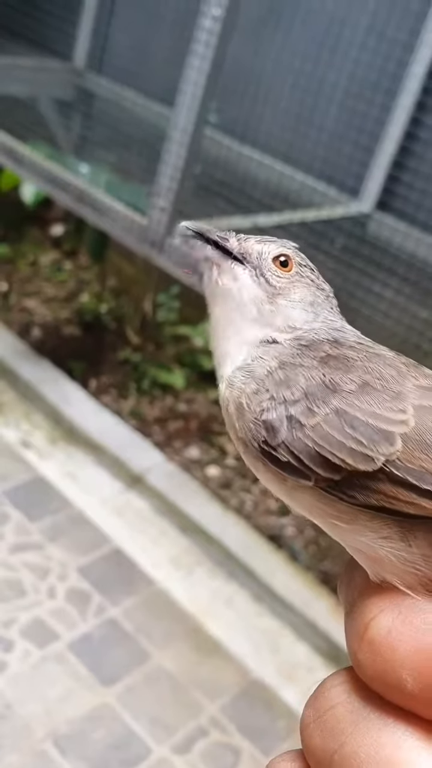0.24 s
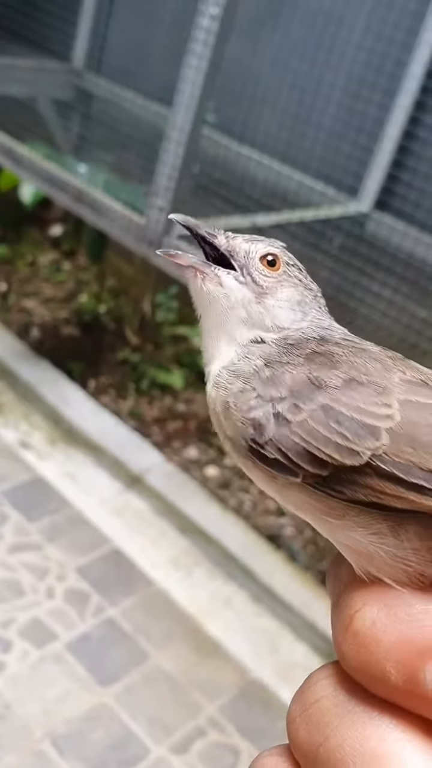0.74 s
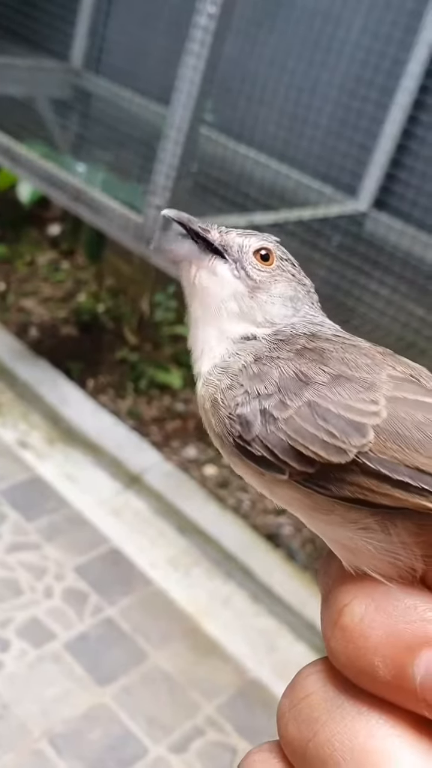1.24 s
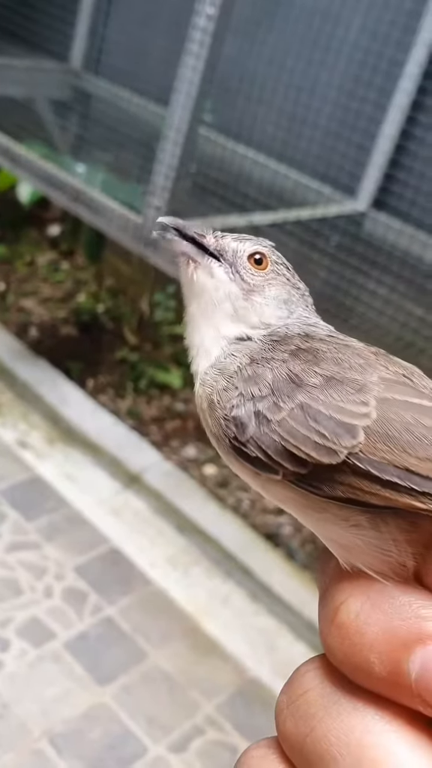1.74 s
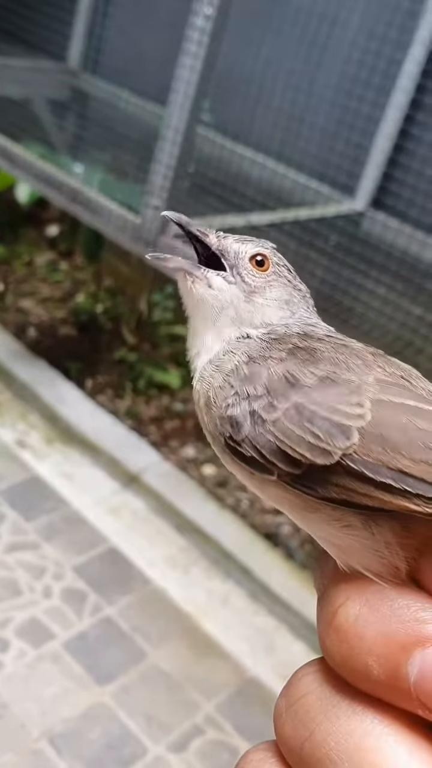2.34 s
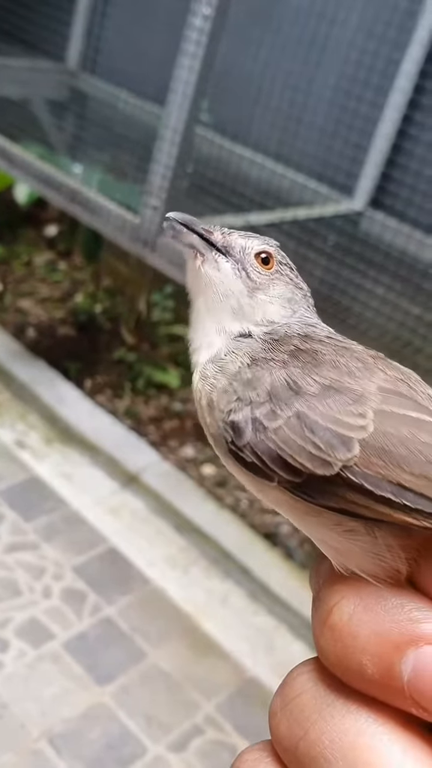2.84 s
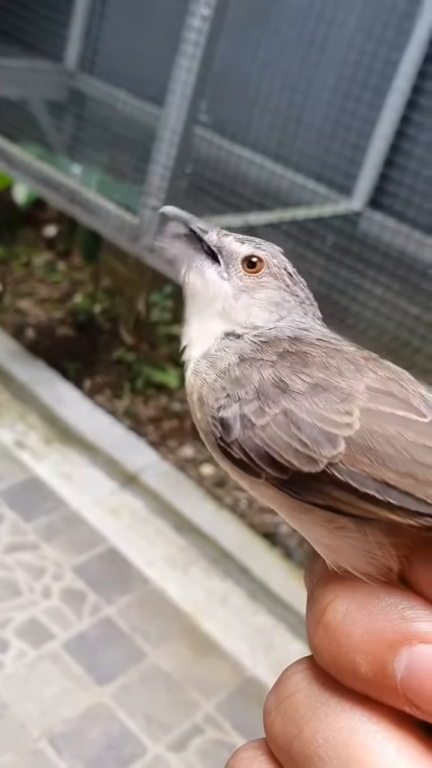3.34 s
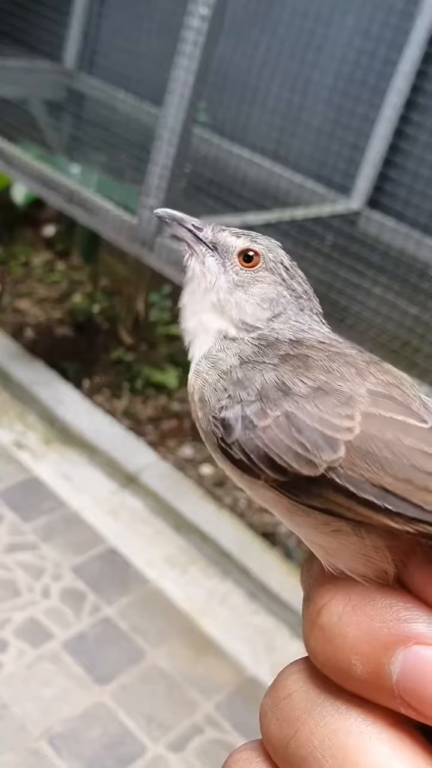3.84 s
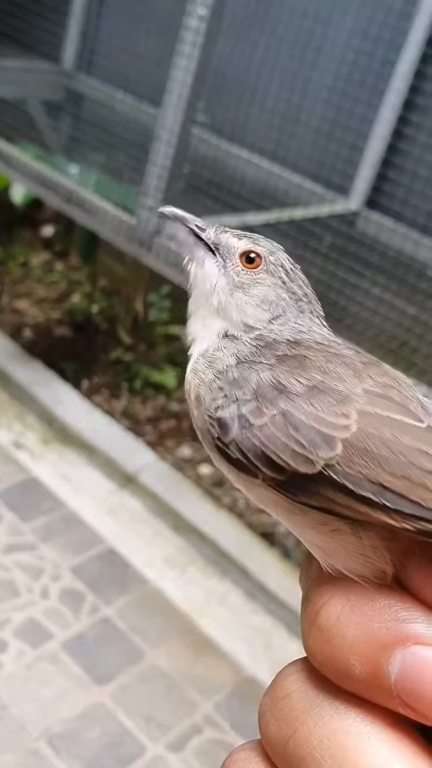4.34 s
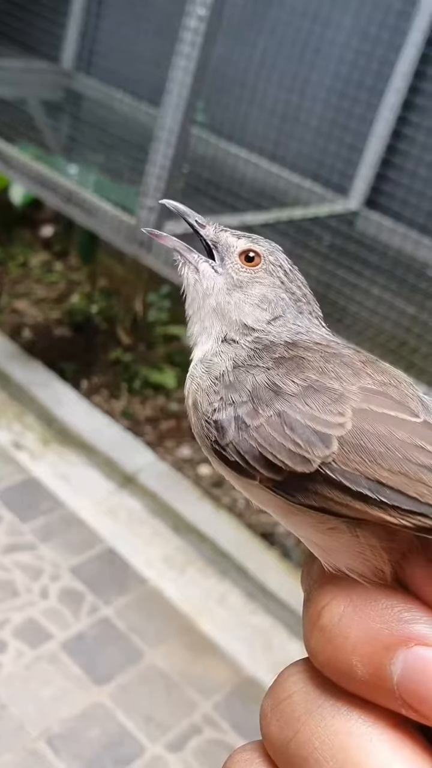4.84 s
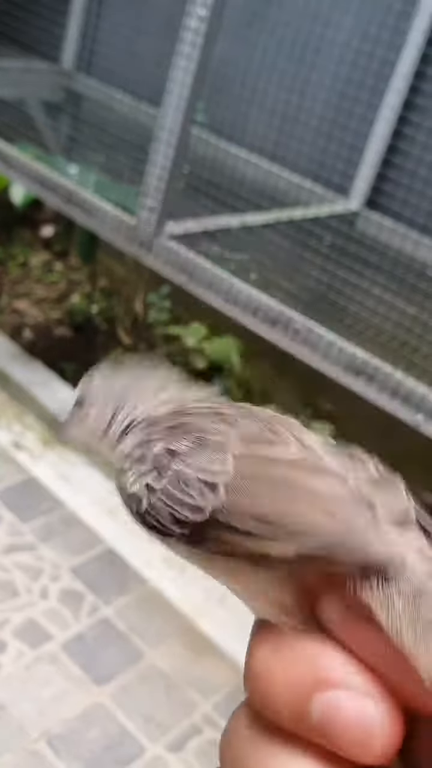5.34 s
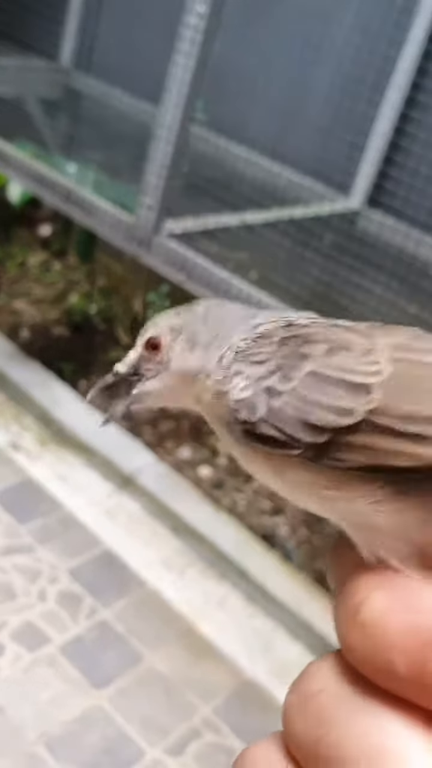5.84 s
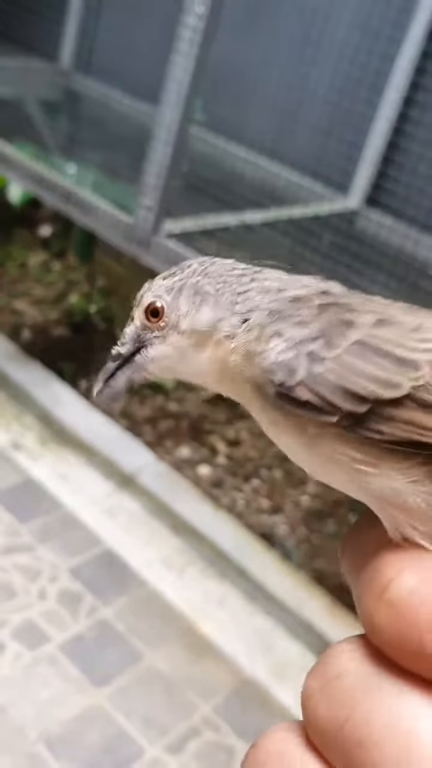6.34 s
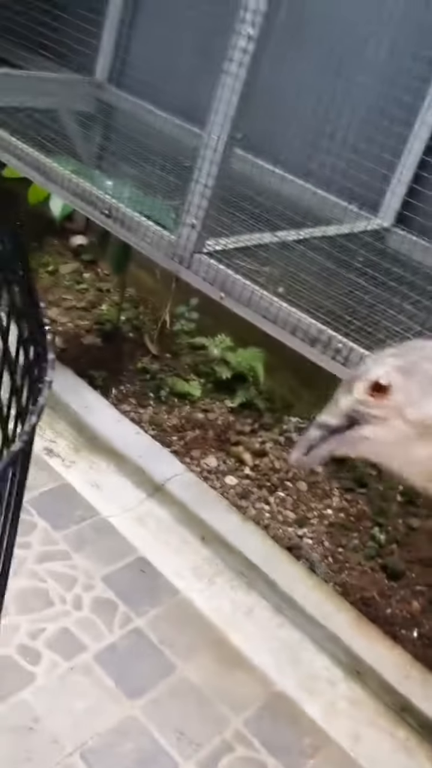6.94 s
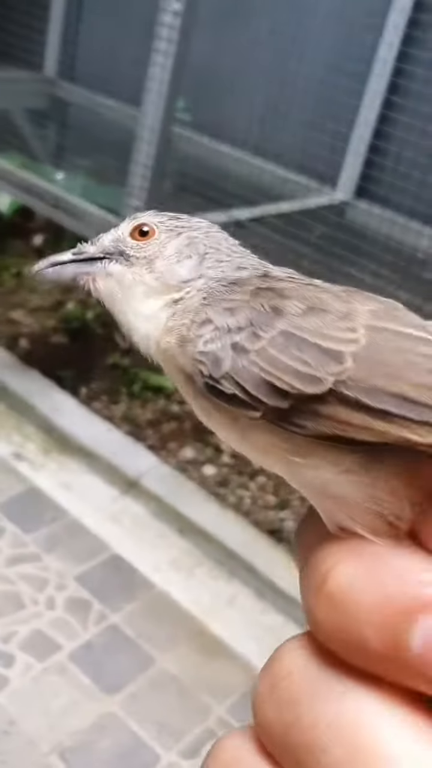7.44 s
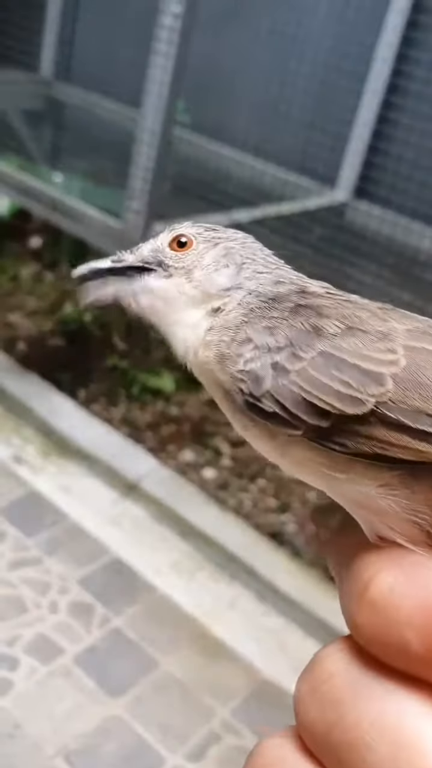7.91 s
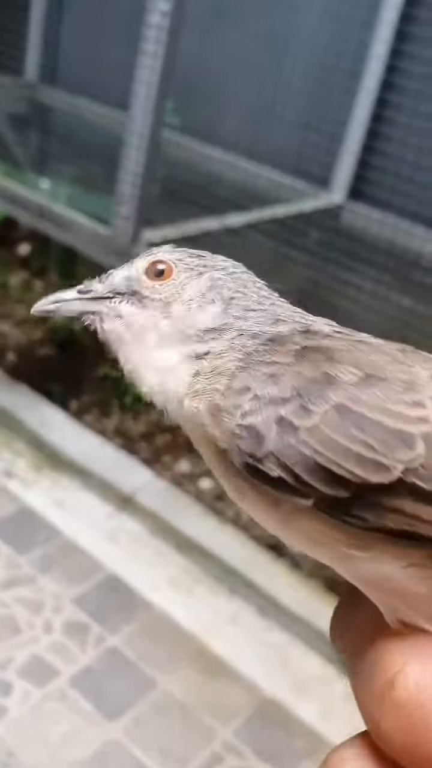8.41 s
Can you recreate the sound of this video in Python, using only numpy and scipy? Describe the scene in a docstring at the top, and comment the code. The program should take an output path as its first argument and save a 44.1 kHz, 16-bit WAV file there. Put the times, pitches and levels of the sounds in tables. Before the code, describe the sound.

In a quiet yard, a small bird right by the microphone whistles two brief series of high upward slurs, followed by a burst of chips and a loud, fast trill. After a short pause it trills again for longer, the piercing notes crackling slightly as they overload the microphone. Behind it are occasional thin peeps from a more distant bird, faint dry rustles and a soft, low rush of air.

```python
"""A prinia, a small songbird, sings in someone's hand close to the microphone, in a yard with wire cages.
Its voice organ whistles two phrases of rising slurs, a short run and two long trills of falling chips.
The loud notes overload the microphone, which adds a soft thump and crackle. A second bird peeps
farther off, something rustles now and then, and a faint hum comes and goes in the quiet air."""
import sys
import numpy as np
from scipy import signal
from scipy.fft import rfft, irfft
from scipy.io import wavfile
from scipy.ndimage import uniform_filter1d, minimum_filter1d

SR = 44100
rng = np.random.default_rng(int(sys.argv[2]) if len(sys.argv) > 2 else 0)


def persist_wave(psi):
    """Save psi, clipped to +-1, as 16-bit WAV."""
    counts = np.round(np.clip(psi, -1, 1) * 32767).astype(np.int16)
    wavfile.write(sys.argv[1], SR, np.atleast_2d(counts).T)


N = 382347


def prinia(chip_reach_hz=5000, slur_reach_hz=5260):
    """The near bird sings short diving chips, alone and in trills, and longer rising slurs."""
    # one chip: t/s from mid-sweep, f/Hz, level/dB
    chip_shape = [(-.009, 6850, -40), (-.007, 6420, -16), (-.005, 5920, -3), (-.003, 5330, 2),
                  (0, 4500, -1.5), (.0055, 3330, -4), (.009, 2790, -19), (.014, 2280, -29),
                  (.026, 1560, -47)]
    # one slur: t/s from mid-sweep, f/Hz, level/dB
    slur_shape = [(-.034, 1590, -46.5), (-.021, 2290, -32.5), (-.012, 3213, -10), (0, 3923, -4.5),
                  (0.01, 4850, -4), (0.016, 5320, -5), (.018, 5380, 3)]
    # single chips that open or close a phrase: t/s, level/dB, length factor
    lone_chips = [(0.3926, -17.5, 1.14), (1.107, -15, 1.38), (1.168, -34, 2.1), (1.7831, -14.5, 1.2),
                  (1.844, -18.5, 0.91), (2.28, -25.5, 0.76), (2.543, -12, 1.2), (2.6052, -15.5, 0.67),
                  (6.1069, -13.5, 1)]
    # rising notes: t/s, level/dB, length factor
    slur_notes = [(0.488, -17, 0.69), (0.5589, -13.5, 0.82), (0.6348, -11.5, 0.95), (0.7097, -10, 0.95),
                  (0.7817, -12, 0.93), (0.8575, -11.5, 0.95), (1.203, -14.5, 0.53), (1.2765, -10.5, 0.94),
                  (1.3527, -8.5, 0.92), (1.4270, -11, 1.06), (1.502, -10.5, 0.84)]
    # runs of chips: first and last t/s, chip count, haste and slowing per chip (shares of a gap),
    # first and last level/dB, first and last length factor, first and last reach/Hz
    trills = [(1.901, 2.2152, 7.2, 0.0014, 0.011, -14, -10, 0.7, 1.02, 5050, 5060),
              (2.668, 4.6195, 29.5, 0.022, 0.0013, -9, -9.5, 0.92, 0.93, 6060, 6700),
              (6.1715, 8.6426, 38, .103, .001, -7.5, -9, .9, .97, 5623, 7600)]
    falling = [(*chip, chip_reach_hz) for chip in lone_chips]
    falling += [chip for row in trills for chip in trill(*row)]
    rising = [(*slur, slur_reach_hz) for slur in slur_notes]
    chips = sing(falling, chip_shape, octave_db=-29, third_db=-33.5, hiss_db=-25,
                 pitch_spread=.014, jitter=.012, shimmer_db=2)
    slurs = sing(rising, slur_shape, octave_db=-38, third_db=-38, hiss_db=-24.5,
                 pitch_spread=.0051, jitter=.012, shimmer_db=2.4)
    return chips + slurs


def trill(first_s, last_s, chips, haste, slowing, first_db, last_db, first_length, last_length,
          first_hz, last_hz, settle_chips=2, spread_db=.12):
    """The bird rushes the first chips, then slowly tires: gaps and chips get longer."""
    k = np.arange(round(chips) - 1)
    gaps = 1 - haste * np.exp(-k / settle_chips) + slowing * k
    progress = np.append(0, np.cumsum(gaps)) / gaps.sum()
    first = (0, first_s, first_db, first_length, first_hz)
    last = (1, last_s, last_db, last_length, last_hz)
    s, db, length, reach_hz = along([first, last], progress)
    db = db - spread_db * rng.standard_normal(len(s))
    return list(zip(s, db, length, reach_hz))


def sing(notes, shape, octave_db, third_db, hiss_db, pitch_spread, jitter, shimmer_db,
         crack_s=.0029, crack_db=11, crack_jump=.15, strain=.11, release_s=.0015):
    """Each note is the same sweep, sung longer or shorter, with a little hiss; no two are alike."""
    # where the voice cracks: t/s, strength
    cracks = [(0.494, 0.35), (0.5672, 0.83), (.789, 0.21), (0.8642, 0.22), (1.213, 1), (1.436, 0.36),
              (1.511, 0.41), (3.396, 0.32), (4.207, 0.35), (7.621, 0.35), (7.691, 0.32), (8.504, 0.64)]
    # a bright, rasping hiss that rides on each note: f/Hz, level/dB
    hiss_colour = [(1500, -16.5), (5000, -1), (7500, -3.5), (10500, -11), (12700, -2), (14000, -9)]
    out, hiss_level = np.zeros(N), np.zeros(N)
    for s, level_db, length, reach_hz in notes:
        t = np.arange(shape[0][0] * length, shape[-1][0] * length, 1 / SR)
        hz, db = along(shape, t / length)
        hz = hz * (1 + pitch_spread * rng.standard_normal() + jitter * waver(672, size=len(t)))
        db = db + level_db + shimmer_db * waver(510, size=len(t))
        # a note with no listed crack gets a small random one
        small_crack = s + crack_s * rng.standard_normal(), strain * rng.exponential()
        at, strength = next((row for row in cracks if t[0] < row[0] - s < t[-1]), small_crack)
        # at a crack the pitch jumps about; the level sags, with a surge on either side
        away = ((s + t - at) / crack_s) ** 2
        crack = strength * np.exp(-away / 2)
        hz = hz * (1 + crack_jump * crack * (1 + waver(1700, size=len(t))))
        db = db + crack_db * crack * (away - 1)
        # the voice fades out above the highest pitch it can reach
        db = db - 10 * np.log10(1 + (hz / reach_hz) ** 30)
        release = np.minimum((t[-1] - t) / release_s, 1)
        add(out, s + t[0], whistle(hz, db, octave_db, third_db) * release)
        add(hiss_level, s + t[0], from_db(db + hiss_db))
    return out + hiss_level * noise(hiss_colour)


def whistle(hz, db, octave_db, third_db):
    """A nearly pure tone with two overtones, like a bird's voice softened by its throat."""
    phase = 2 * np.pi * np.cumsum(hz) / SR
    octave = from_db(octave_db) * np.sin(2 * phase)
    third = from_db(third_db) * np.sin(3 * phase) * (3 * hz < SR / 2)
    return np.sqrt(2) * from_db(db) * (np.sin(phase) + octave + third)


def yard(x, direct_db, tail_db, t60=.39, build_s=.00067, early_db=4, early_s=.02):
    """Sound arrives directly, then as close echoes and a blurred tail that loses 60 dB in t60 seconds."""
    # hand, phone and cage throw the sound back: delay/s, level/dB
    echoes = [(.0012, -14.5), (.0035, -11.5), (.0061, -18.5), (0.0163, -35.5), (0.018, -28)]
    # tone of the yard's tail: f/Hz, level/dB
    tail_colour = [(500, 5.5), (2000, 4.5), (3200, -2), (4500, -5), (6000, -11), (8000, -2.5), (13000, -5)]
    t = np.arange(SR) / SR
    fade = from_db(-60 * t / t60 + early_db * np.exp(-t / early_s))
    build = 1 - np.exp(-t / build_s)
    tail = rms_one(noise(tail_colour, size=SR) * fade * build)
    response = from_db(tail_db) * tail / np.sqrt(SR)
    response[0] += from_db(direct_db)
    for delay, db in echoes:
        response[round(delay * SR)] += from_db(db)
    return signal.fftconvolve(x, response)[:N]


def overload(song, crackle_db=-35, top_hz=11500):
    """The microphone flattens one side of the wave: loud notes gain an octave, a thump and crackle."""
    # how lopsided the wave gets, most while the beak points down: t/s, bend/dB
    bends = [(0, -12), (4.7, -9.5), (6.1, 4), (6.85, -1), (7.12, 13.5), (7.55, -8), (8.67, -5.5)]
    # crackle that rides on loud notes: f/Hz, level/dB
    crackle_colour = [(120, -10.5), (280, 7.5), (520, 9), (880, 11.5), (1600, 12.5), (4000, -8.5),
                      (7500, -19), (10000, -19), (13000, -32.5)]
    bend_db, = along(bends, np.arange(N) / SR)
    bent = song / (1 + from_db(bend_db) * np.maximum(-song, 0))
    bent = signal.sosfilt(signal.butter(4, top_hz, fs=SR, output="sos"), bent)
    loudness = np.sqrt(np.abs(uniform_filter1d(song ** 2, size=64)))
    return bent + from_db(crackle_db) * loudness * noise(crackle_colour)


def ringing_yard(level_db=-30, t60=.27, band_hz=(2700, 5900)):
    """A fading wash of noise: at the start the yard still rings with an earlier phrase."""
    wash = signal.sosfilt(signal.butter(5, band_hz, "band", fs=SR, output="sos"), rng.standard_normal(N))
    return rms_one(wash) * from_db(level_db - 60 * np.arange(N) / SR / t60)


def far_bird(jitter=.016, shimmer_db=3.5):
    """A second bird whistles thin, slightly arched, trembling peeps with a strong octave."""
    # its calls: t/s, length/s, f/Hz, level/dB, octave/dB
    peeps = [(0.053, 0.11, 4790, -32, -10), (1.225, 0.064, 4670, -27, -15.5), (1.3, 0.046, 4700, -45, -16),
             (2.447, 0.083, 4716, -32.5, -12.5), (2.545, 0.061, 4548, -42.5, -2.5),
             (3.521, 0.068, 4810, -36, -9.5), (4.651, 0.088, 4710, -33, -12), (5.978, 0.1, 4742, -30, -15),
             (7.544, 0.11, 4753, -31.5, -13)]
    # one peep: share of its length, pitch factor, level/dB
    peep_shape = [(0, .96, -1.5), (.3, .995, 13), (.55, 1.012, 2.5), (.85, 1.0, 5.5), (1, 0.9, -15)]
    out = np.zeros(N)
    for s, length, pitch_hz, level_db, octave_db in peeps:
        bend, db = along(peep_shape, np.arange(0, 1, 1 / (length * SR)))
        hz = pitch_hz * (bend + jitter * waver(600, size=len(db)))
        db = db + level_db + shimmer_db * waver(300, size=len(db))
        add(out, s, whistle(hz, db, octave_db, third_db=-64.5))
    return out


def rustles(attack_s=.0065, grain_db=2.5, t60=.45):
    """Dry, grainy swishes start quickly, hold a moment and die away in the yard."""
    # brief swishes and longer rustling: t/s, level/dB, hold/s
    swishes = [(0.044, -44.5, 0.01), (1.065, -48.5, 0.071), (1.246, -43, 0.28), (1.76, -43, 0.26),
               (2.422, -48.5, 0.23), (2.67, -52.5, 1.93), (4.807, -47, 0.086), (5.08, -44, 0.087),
               (5.33, -47, 0.078), (5.506, -56.5, 0.11), (5.971, -57, 0.035), (6.17, -54, 1.3),
               (7.55, -47, 0.95)]
    # tone of a rustle: f/Hz, level/dB
    rustle_colour = [(200, -54), (650, -19), (950, -12), (1600, -15.5), (2400, -14.5), (4200, -7),
                     (5000, -12.5), (6000, -7), (7400, -19.5), (10000, -21.5), (13000, -35)]
    swell, t = np.zeros(N), np.arange(N) / SR
    attack = 1 - np.exp(-t / attack_s)
    for s, level_db, hold_s in swishes:
        add(swell, s, attack * from_db(level_db - 60 * np.maximum(t - hold_s, 0) / t60))
    return swell * noise(rustle_colour) * from_db(grain_db * waver(140, size=N))


def far_hum(fade_db_per_s=30.5, jitter=.05, shimmer_db=4):
    """A faint low tone from far away wavers, comes and goes."""
    # the top of each swell: t/s, f/Hz, level/dB
    swells = [(2.38, 426, -67), (4.3, 367.5, -63), (5.2, 403, -66.5)]
    out, t = np.zeros(N), np.arange(N) / SR
    for s, pitch_hz, level_db in swells:
        hz = pitch_hz * (1 + jitter * waver(70, size=N))
        db = level_db - fade_db_per_s * np.abs(t - s) + shimmer_db * waver(25, size=N)
        out += whistle(hz, db, octave_db=-15, third_db=-20)
    return out


def quiet_air(level_db=-59.5):
    """The yard's steady background is a soft, low rush."""
    # tone of the background: f/Hz, level/dB
    air_colour = [(25, -25), (45, -9.5), (68, 0.5), (115, -18.5), (165, -11), (280, -15), (600, -26),
                  (2000, -34.5), (4100, -54.5), (13000, -63)]
    return from_db(level_db) * noise(air_colour)


def widen(x, crossover_hz=4350):
    """The bass is alike in both ears; echoes make the treble differ a little."""
    # echoes that reach left and right unequally: delay/s, level/dB
    side_echoes = [(.0016, -19), (.0042, -20), (.0165, -26)]
    treble = signal.sosfilt(signal.cheby1(10, 1, crossover_hz, "high", fs=SR, output="sos"), x)
    side = np.zeros(N)
    for delay, db in side_echoes:
        add(side, delay, from_db(db) * treble)
    return np.array([x + side, x - side])


def noise(colour, size=N):
    """Noise of strength 1, with its tone set by rows of f/Hz, level/dB."""
    hz, db = np.transpose(colour)
    bins = np.maximum(np.arange(size // 2 + 1) * SR / size, 1)
    gain = from_db(np.interp(np.log(bins), np.log(hz), db))
    return rms_one(irfft(rfft(rng.standard_normal(size)) * gain, size))


def waver(rate, size):
    """A random wobble that glides to a new value rate times a second."""
    turns = rng.standard_normal(size=4096)
    return np.interp(np.arange(size) * rate / SR, np.arange(len(turns)), turns, period=len(turns))


def from_db(db):
    """Turn decibels into a factor to multiply by."""
    return 10 ** (np.asarray(db) / 20)


def rms_one(x):
    """Scale a sound to an average strength (rms) of 1."""
    return x / np.sqrt(np.mean(x ** 2) + 1e-20)


def along(rows, x):
    """Look up x in a table's first column and read the other columns there."""
    first, *columns = np.transpose(rows)
    return [np.interp(x, first, c) for c in columns]


def add(track, s, sound):
    """Lay a sound into a track from time s on."""
    at = max(round(s * SR), 0)
    part = sound[:max(N - at, 0)]
    track[at:at + len(part)] += part


def scene():
    """Both birds sound through the yard, over its quiet background; only the near one overloads."""
    near = overload(yard(prinia(), direct_db=.5, tail_db=-6))
    far = yard(far_bird(), direct_db=-7, tail_db=1.5)
    air = quiet_air()
    return widen(near + ringing_yard() + far + rustles() + far_hum() + air)


def record(dry, ceiling=.85, cutoff_hz=13000):
    """A fast limiter turns both channels down together at the peaks; the highest treble is cut."""
    needed_gain = ceiling / np.maximum(np.abs(dry).max(axis=0), ceiling)
    gain = uniform_filter1d(minimum_filter1d(needed_gain, size=129), size=129)
    return signal.sosfilt(signal.ellip(10, .1, 70, cutoff_hz, fs=SR, output="sos"), dry * gain)


dry = scene()
out = record(dry)
persist_wave(out)
```